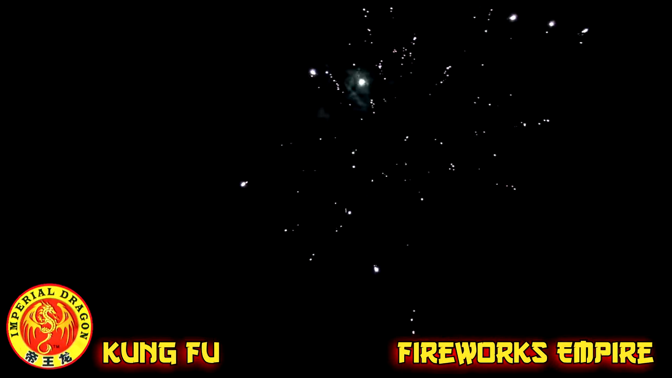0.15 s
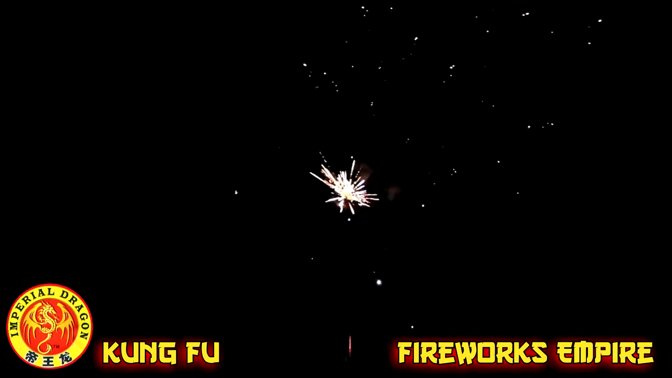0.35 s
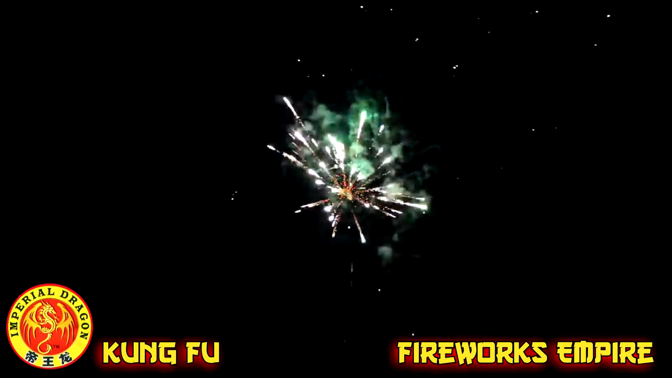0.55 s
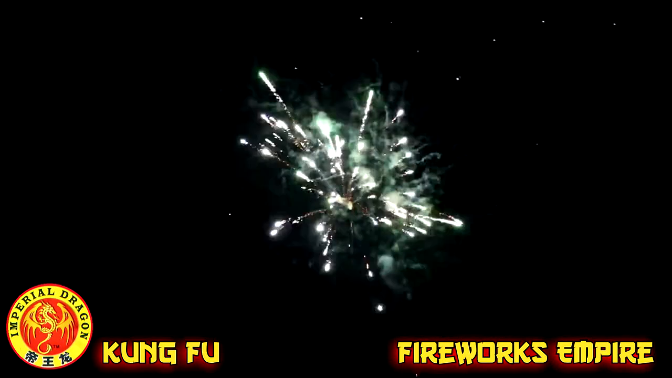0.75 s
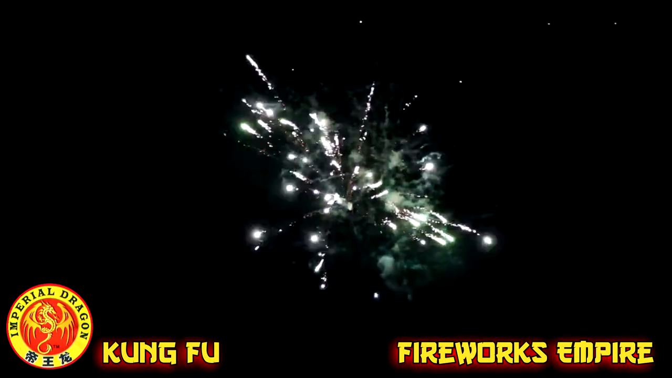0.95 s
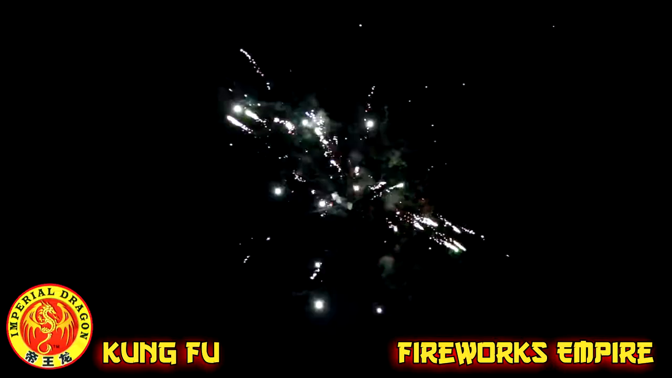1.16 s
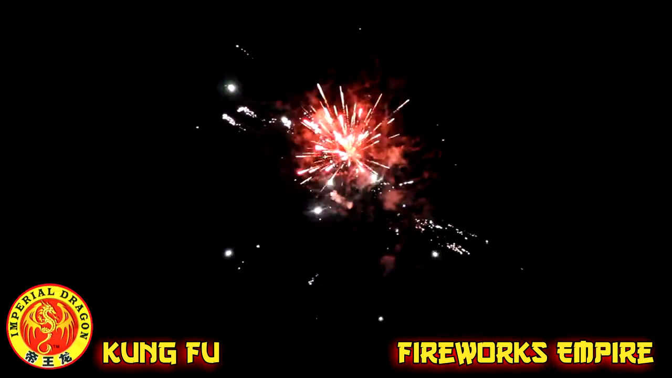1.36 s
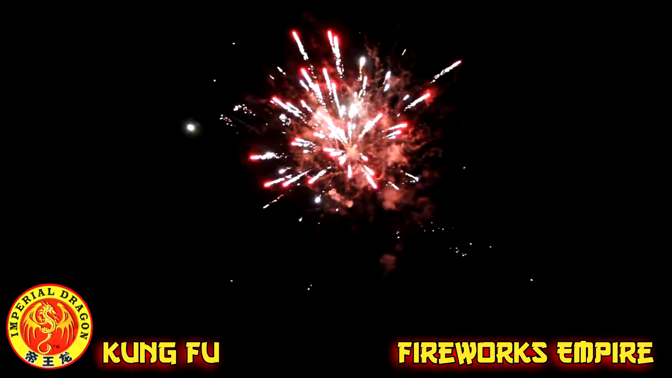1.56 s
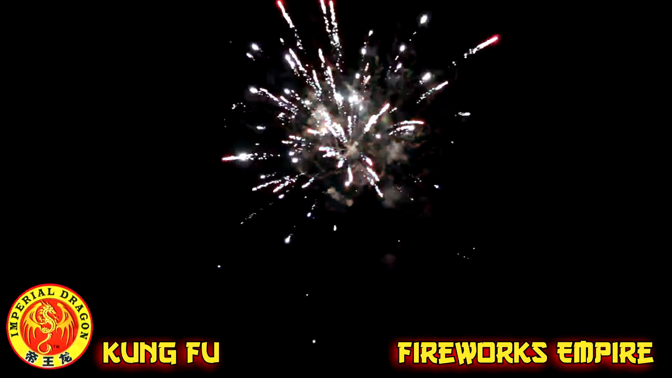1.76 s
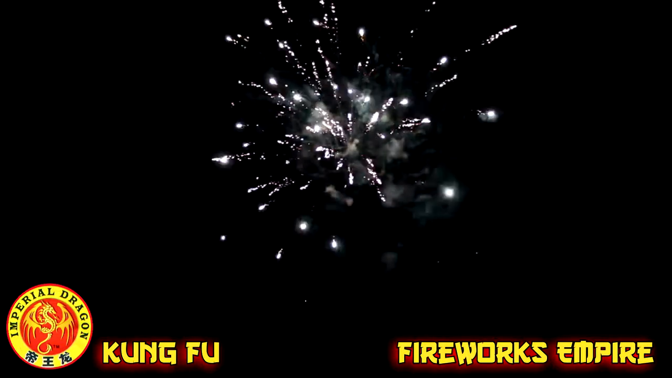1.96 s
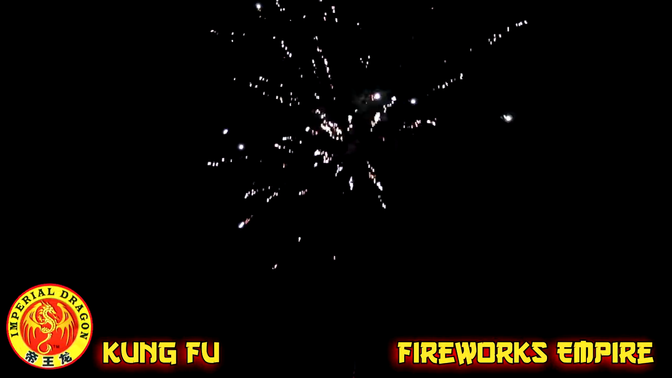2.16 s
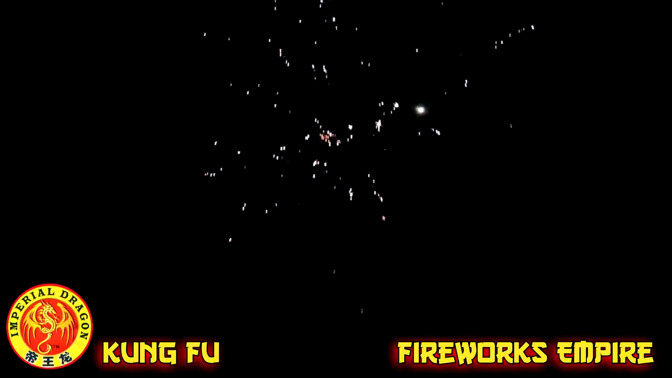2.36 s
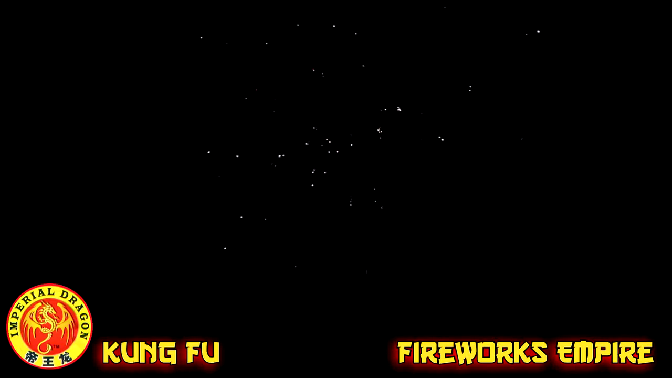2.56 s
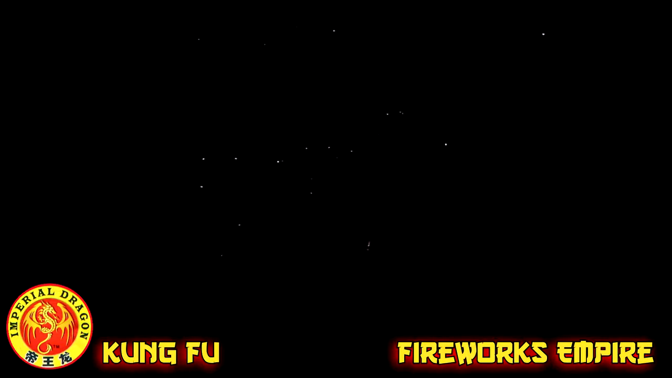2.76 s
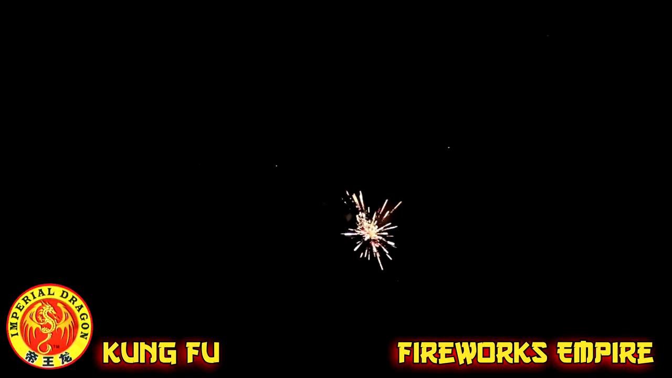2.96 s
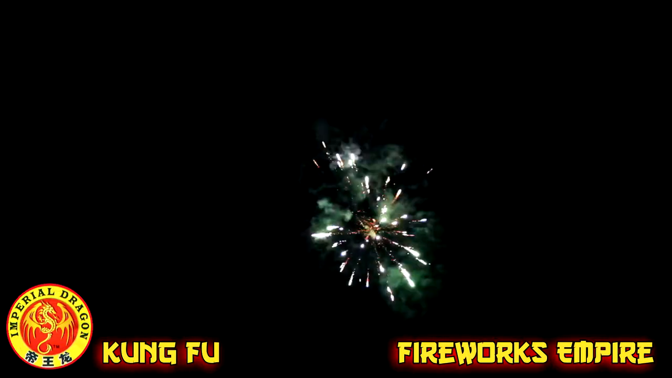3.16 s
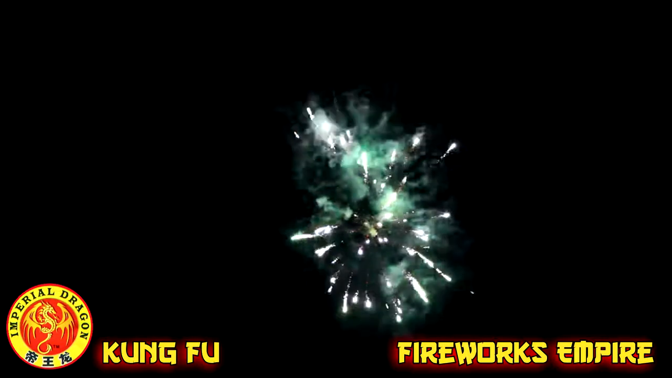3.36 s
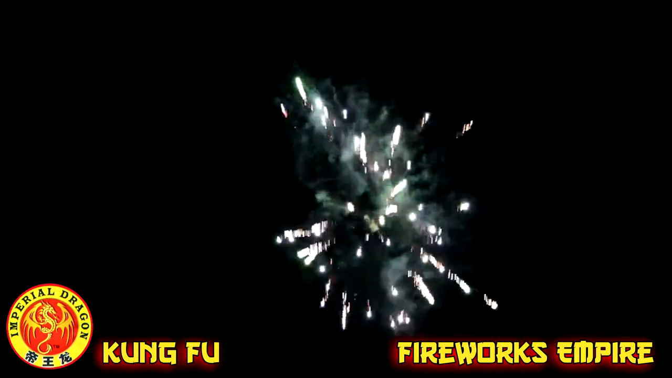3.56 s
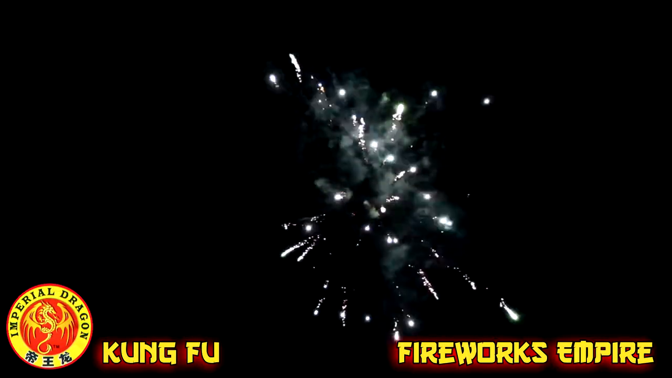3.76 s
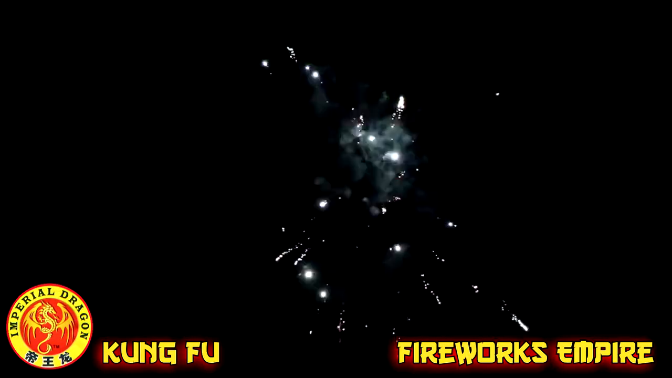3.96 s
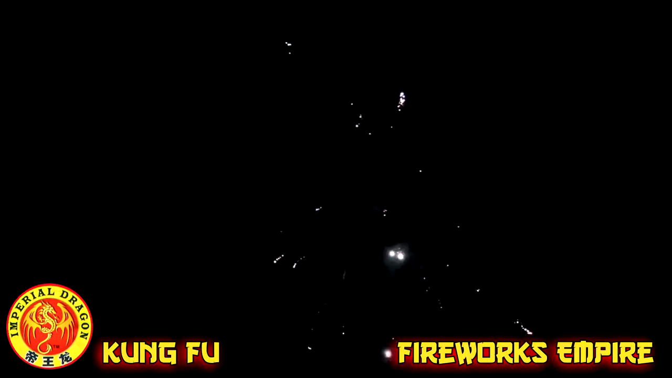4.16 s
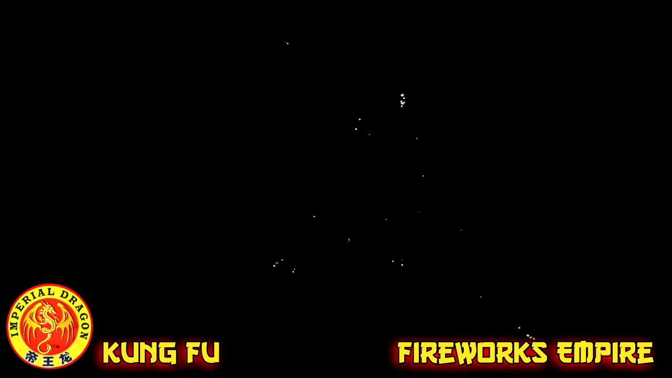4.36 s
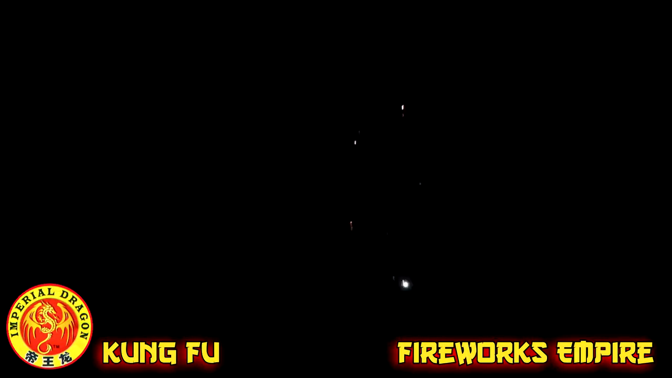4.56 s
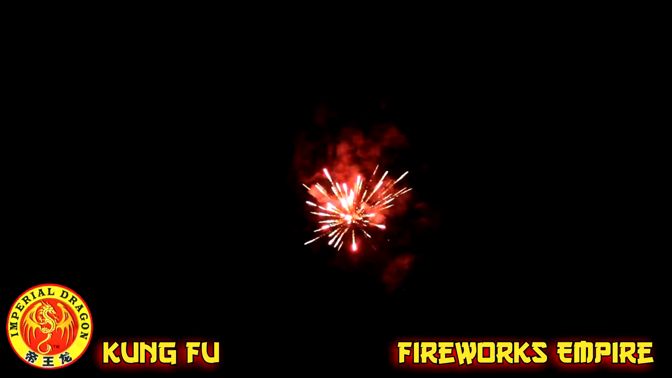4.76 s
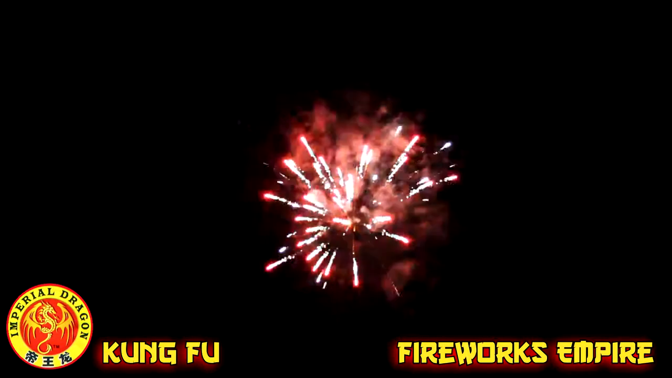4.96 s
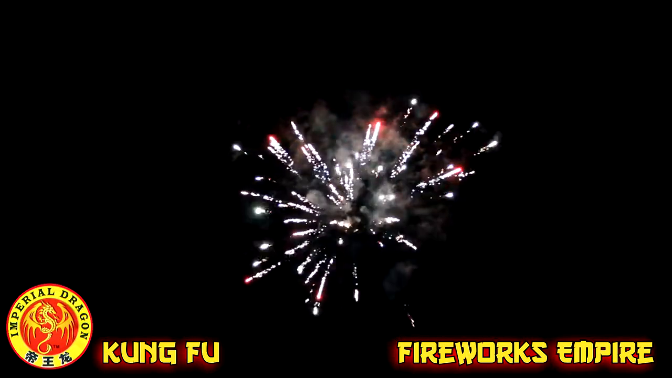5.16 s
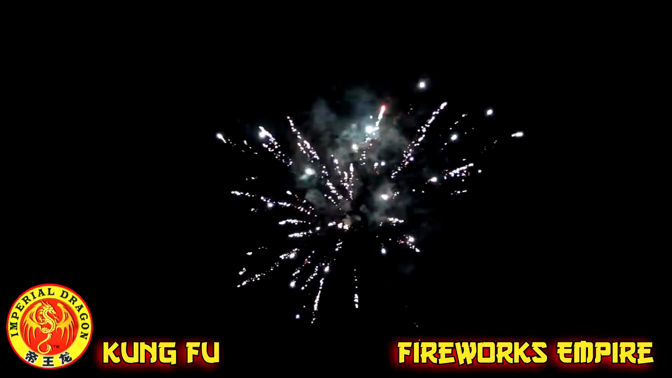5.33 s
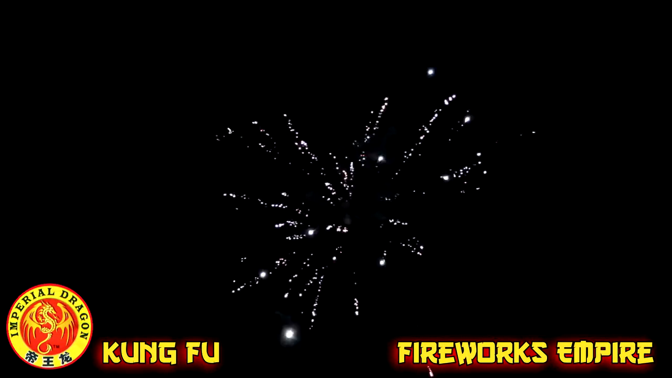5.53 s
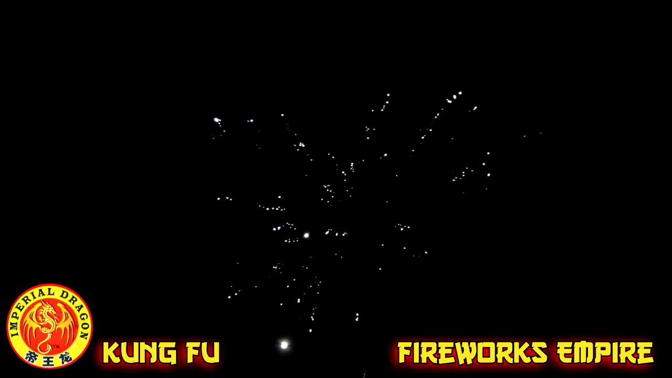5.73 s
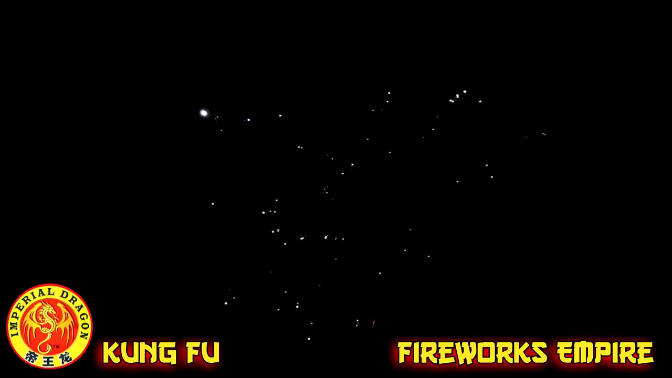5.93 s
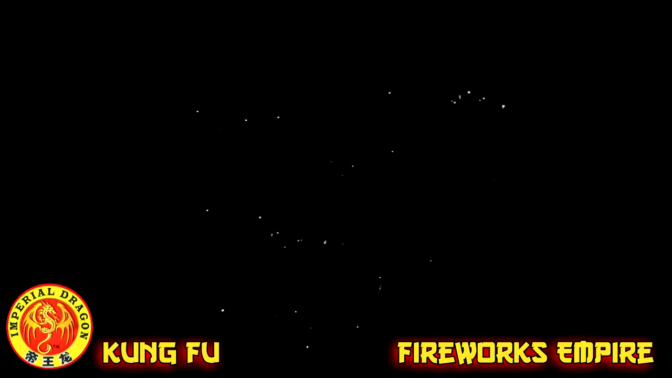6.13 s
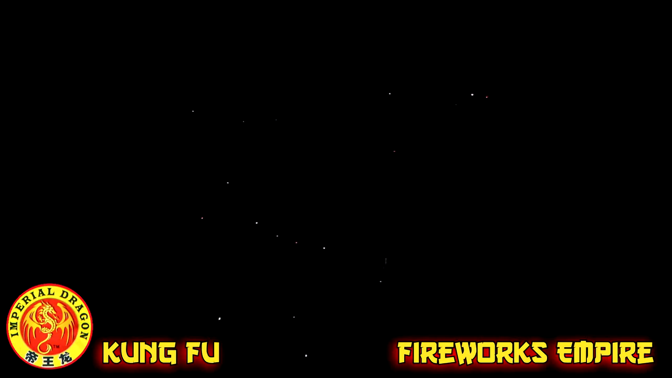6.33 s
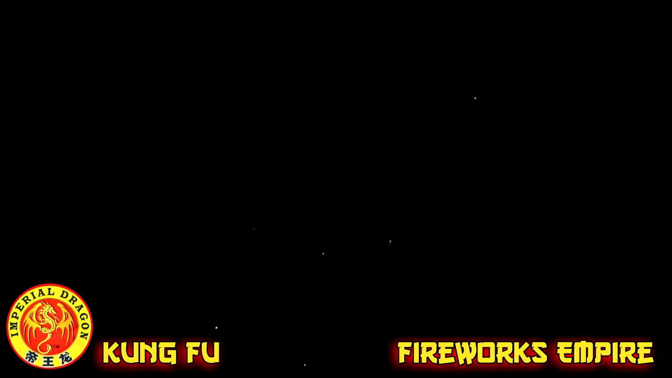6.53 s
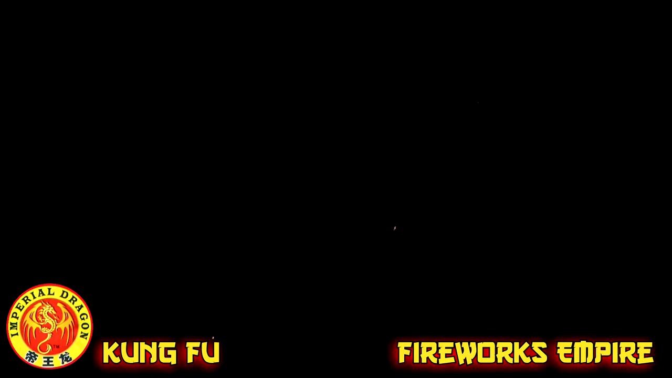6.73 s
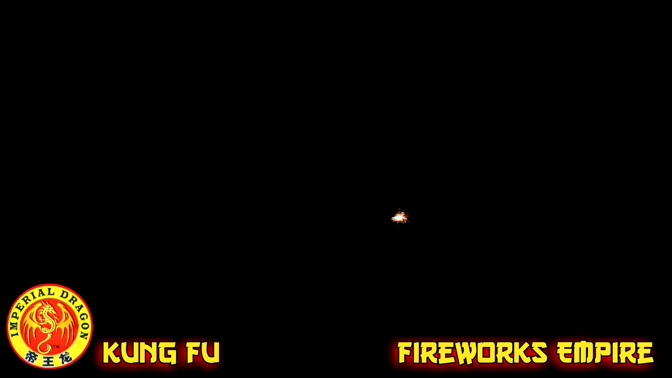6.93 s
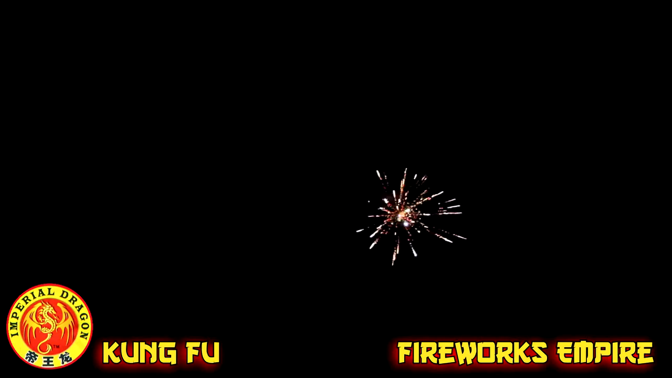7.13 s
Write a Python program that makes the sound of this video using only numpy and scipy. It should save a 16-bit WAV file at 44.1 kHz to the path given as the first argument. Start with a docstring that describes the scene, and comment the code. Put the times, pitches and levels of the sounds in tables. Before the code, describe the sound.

Spaced firework bangs at night: thumping launches, sharp distorted bursts, clattering echoes, faint fizz and small hard clinks over distant traffic rumble.

```python
"""A firework cake fires at night in the open: lift charges thump out of tubes, shells burst overhead.
Each blast is a few dying swings; both kinds overload the microphone input.
Ground, walls and trees return them as slaps (short swings) and rolling rumble (bands of noise).
Some stars fizz in noise, spent casings clink nearby as struck modes; far traffic and insects are noise."""
import sys
import numpy as np
from scipy import signal
from scipy.io import wavfile

SR = 44100
rng = np.random.default_rng(int(sys.argv[2]) if len(sys.argv) > 2 else 0)


def output_pcm(signal):
    """Save a mono or channel-first signal as 16-bit PCM at the path in sys.argv[1].

    Samples are clipped to [-1, 1] before scaling.
    """
    pcm = np.clip(np.atleast_2d(signal).T, -1, 1) * 32767
    wavfile.write(sys.argv[1], SR, np.round(pcm).astype(np.int16))


N = 317079
STEP = 16  # samples between envelope points


def amp(db):
    """Decibels to gain."""
    return 10 ** (np.asarray(db) / 20)


def rms_one(x):
    """Scale to unit rms."""
    return x / np.sqrt(np.mean(x ** 2) + 1e-20)


def bandpass(order, low_hz, high_hz, x):
    """Keep the sound between two pitches."""
    return signal.sosfilt(signal.butter(order, [low_hz, high_hz], "band", fs=SR, output="sos"), x)


def delayed(x, seconds):
    """The same sound, later."""
    return np.pad(x, (round(seconds * SR), 0))[:N]


def at_hz(points, hz):
    """Read a spectrum on a log-frequency axis."""
    pitch_hz, level_db = np.transpose(points)
    return np.interp(np.log(hz), np.log(pitch_hz), level_db)


def clicks(times, heights, rate=SR):
    """Impulses on a grid of the given rate; those outside the scene are left out."""
    out = np.full(int(N * rate / SR) + 1, 1e-18)
    at = np.round(np.asarray(times) * rate).astype(int)
    inside = (at >= 0) & (at < len(out))
    np.add.at(out, at[inside], np.asarray(heights)[inside])
    return out


def ring(x, hz, t60):
    """A shock front: the pressure jumps, then swings as a dying cosine."""
    r, w = amp(-60 / (t60 * SR)), 2 * np.pi * hz / SR
    return signal.lfilter([1, -r * np.cos(w)], [1, -2 * r * np.cos(w), r * r], x)[:N]


def drift(rate):
    """Slow chance on the envelope grid, spread 1."""
    r = np.exp(-2 * np.pi * rate * STEP / SR)
    noise = rng.standard_normal(N // STEP + 4001)
    return rms_one(signal.lfilter([1], [1, -2 * r, r * r], noise)[4000:])


AIR_DB_PER_S, AIR_STEEPNESS = 6.5, 1.7  # loss at 10 kHz along an echo's path, and its power of frequency


def return_power(shots, returns, colour):
    """A function of Hz: power in time of scattered returns, each swelling, dying and losing treble to air."""
    s, shot_db = np.transpose(shots)[:2]
    rate, shapes = SR / STEP, []
    for delay, db, rise, t60, tilt in returns:
        up, down = np.exp(-1 / (max(rise, 1e-4) * rate)), amp(-120 / (t60 * rate))
        begun = np.maximum(-s - delay, 0)  # a return already under way at the start has faded
        power = amp(2 * (shot_db + db - 60 * begun / t60))
        starts = clicks(s + delay + begun, power, rate)
        shapes.append(signal.lfilter([1 - up], np.convolve([1, -up], [1, -down]), starts))
    shapes = np.array(shapes)
    t = np.arange(shapes.shape[1]) / rate
    newest = np.maximum(np.searchsorted(s, t) - 1, 0)
    age = np.maximum(t - s[newest], 0)  # time the newest shot has travelled
    tilts = np.array(returns)[:, 4]

    def power_at(hz):
        level_db = at_hz(colour, hz) + tilts * np.log2(hz / 1000)
        air_db = AIR_DB_PER_S * age * (hz / 10000) ** AIR_STEEPNESS
        return amp(2 * level_db) @ shapes * amp(-2 * air_db)

    return power_at


# Lift charges at the tubes: start_s, level_db
LIFT_SHOTS = [(0.0383, 3.5), (1.7807, 2.5), (3.4436, 2), (5.2667, 3.5), (7.0439, 4)]
# Shells overhead, the first just before the start: start_s, level_db,
# across_m, along_m (both from the middle of the sky)
BURST_SHOTS = [(-0.53, -5, 0.01, 0.01), (0.4715, 5.5, 0.2, 1.5), (1.4204, 5, -2.5, -0.04),
               (3.0471, 5.5, 1.55, -2.5), (4.8286, 6, 0.16, 0.57), (7.1428, 5.5, 0.01, 0.01)]
# Gas jet just ahead of and with a lift's thump, then its scattered returns:
# delay_s, level_db (over the lift), rise_s, t60_s, tilt_db_per_octave
LIFT_SCATTER = [(-.0016, -3.5, 0.00053, 0.059, 1), (0, 3, 0.00014, 0.011, 6.5),
                (0.0117, -11.5, .0005, 0.19, 0.5), (.038, -12.5, 0.0021, 0.073, 0),
                (0.0774, -15.5, 0.00081, 0.075, 2), (.148, -20.5, 0.0022, 0.059, 2),
                (0.204, -23.5, .001, 0.037, -0.5), (.263, -33, .001, 0.068, 1),
                (.02, -23, 0.0092, 0.51, 1.5)]
# Roar of a burst, then its scattered returns:
# delay_s, level_db (over the burst), rise_s, t60_s, tilt_db_per_octave
BURST_SCATTER = [(0, 4, 0.00066, 0.063, -1.5), (.016, -10, 0.0022, 0.23, 0), (.046, -14, .002, 0.02, -7),
                 (0.083, -25, 0.0047, 0.55, 1.5), (0.129, -22, 0.0015, 0.11, -0.5),
                 (.05, -30, 0.024, 1.08, -0.5), (.3, -36, 0.28, 2.05, -1), (.93, -34.5, 0.013, 0.31, -3.5),
                 (1.17, -50, 0.0042, 0.13, -7), (1.443, -38.5, 0.025, 0.11, -2)]
# Spectrum of the lift returns: pitch_hz, level_db (per Hz)
LIFT_SPECTRUM = [(15, -51), (25, -16.5), (312, 0), (479, -9), (519, -9), (610, -15), (1290, -19.5),
                 (2040, -10), (2740, -14), (8030, -23.5), (15300, -52.5)]
# Spectrum of the burst returns and the fizz: pitch_hz, level_db (per Hz)
BURST_SPECTRUM = [(15, -62), (25, -38), (49, -20), (81, -11.5), (245, -7.5), (312, -5.5), (519, -4.5),
                  (938, -0.5), (1190, -1), (1880, -8.5), (2340, -6), (8030, -17.5), (9960, -22),
                  (15300, -73)]
# Stars of glittering shells start to fizz: start_s, level_db
FIZZ_STARTS = [(0, -34.5), (0.88, -30), (3.47, -29)]
# Swell of one fizz: delay_s, level_db (over its start level), rise_s, t60_s, tilt_db_per_octave
FIZZ_SWELL = [(0.0015, -2.5, 0.018, 2.17, -1)]
# Background between the blasts: start_s, traffic_db, insects_db
NIGHT_LEVELS = [(0, -20, -54), (.45, -39, -52.5), (.86, -33, -68), (1.4, -23.5, -56), (2.5, -25, -64),
                (3, -27, -58.5), (4.2, -30, -60), (4.8, -25.5, -57), (6.1, -31.5, -58), (6.6, -26, -56),
                (7.19, -23.5, -56.5)]
# Spectrum of the far traffic: pitch_hz, level_db (per Hz)
TRAFFIC_SPECTRUM = [(15, -54), (30, -27), (80, -5.5), (140, -9), (260, -18), (450, -7), (830, -0.5),
                    (1800, -15), (3500, -24), (6000, -34), (10000, -40), (15000, -60)]
LOW_BOUNCE_S, LOW_BOUNCE_GAIN = 0.0007, 0.068


def rumble_fizz_and_traffic(patchy_db, return_db):
    """Quarter-octave bands of noise carry the roar and scattered returns, the fizz and the traffic."""
    lift = return_power(LIFT_SHOTS, LIFT_SCATTER, LIFT_SPECTRUM)
    burst = return_power(BURST_SHOTS, BURST_SCATTER, BURST_SPECTRUM)
    fizz = return_power(FIZZ_STARTS, FIZZ_SWELL, BURST_SPECTRUM)
    grid = np.arange(N // STEP + 1) * STEP
    traffic_db = np.interp(grid / SR, *np.transpose(NIGHT_LEVELS)[:2])
    edges = 22 * 2 ** (np.arange(39) / 4)
    white = rng.standard_normal((2, N))  # neighbouring bands take turns, so they differ
    flutter, out = drift(48.9), 0
    for k, (low, high) in enumerate(zip(edges, edges[1:])):
        hz = np.sqrt(low * high)
        uneven_db = patchy_db * (flutter + drift(22))  # many reflectors, unevenly spaced
        echoes = (lift(hz) + burst(hz) + fizz(hz)) * amp(2 * (return_db + uneven_db))
        traffic = amp(2 * (at_hz(TRAFFIC_SPECTRUM, hz) + traffic_db))
        gain = np.interp(np.arange(N), grid, np.sqrt(echoes + traffic))
        out = out + gain * bandpass(2, low, high, white[k % 2])
    # far sound also skims off the ground by the microphone, inverted
    return out - LOW_BOUNCE_GAIN * delayed(out, LOW_BOUNCE_S)


INSECT_HZ, INSECT_WIDTH_HZ = 4660, 650


def insects():
    """A far chorus blurs into a band of hiss."""
    low, high = INSECT_HZ - INSECT_WIDTH_HZ / 2, INSECT_HZ + INSECT_WIDTH_HZ / 2
    hiss = bandpass(3, low, high, rng.standard_normal(N))
    level_db = np.interp(np.arange(N) / SR, *np.transpose(NIGHT_LEVELS)[::2])
    return amp(level_db) * rms_one(hiss)


def blasts(shots, modes, spread_db, detune):
    """Every shot swings in each mode with a strength and a pitch of its own."""
    luck, out = rng.standard_normal((len(shots), len(modes), 2)), 0
    for (s, shot_db, *_), row in zip(shots, luck):
        for (hz, db, t60), (louder, higher) in zip(modes, row):
            jump = clicks([s], [amp(shot_db + db + spread_db * louder)])
            out = out + ring(jump, hz * (1 + detune * higher), t60)
    return out


# What a lift rings with at the tube: pitch_hz, level_db (over the lift), t60_s
TUBE_MODES = [(279.5, 14.5, 0.018), (209, 11.5, 0.013), (60, 5, 0.014), (900, 11, 0.0019)]
GROUND_ECHO_S, GROUND_ECHO_DB, GROUND_HZ = 0.005024, -12.5, 410


def lifts():
    """The tube's thump, and a duller copy off the ground."""
    direct = blasts(LIFT_SHOTS, TUBE_MODES, spread_db=0.8, detune=0.015)
    dull = signal.sosfilt(signal.butter(1, GROUND_HZ, fs=SR, output="sos"), direct)
    return direct + amp(GROUND_ECHO_DB) * delayed(dull, GROUND_ECHO_S)


def shock(hz, turns, top_hz):
    """One reflected shock: a jump, a few swings at most, then still air; dulled on the way."""
    cycles = np.arange(600) / SR * hz
    wave = np.cos(2 * np.pi * cycles) * np.exp(-(cycles / turns) ** 4)
    return signal.sosfilt(signal.butter(2, np.clip(top_hz, 500, 15000), fs=SR, output="sos"), wave)


CRACK_LOW_HZ, CRACK_TOP_HZ, CRACK_T60_S = 1200, 4220, 0.023


def crack():
    """A rough front breaks the shock into a few milliseconds of bright grit."""
    grit = rng.standard_normal(600) * amp(-60 * np.arange(600) / SR / CRACK_T60_S)
    return bandpass(3, CRACK_LOW_HZ, CRACK_TOP_HZ, grit)


# Walls and far fronts that slap the bursts back: delay_s, path_per_m_across, path_per_m_along (extra m per m),
# level_db (over the burst), swing_hz, swings, crack_db (over the slap)
WALL_ECHOES = [(0.0471, 0.0072, 0.028, 0, 1026, 0.89, -32), (0.0524, 0.018, 0.072, -8, 800, 1.3, -34),
               (.233, .3, 0, -33, 900, 1.1, 1), (0.2595, .74, .32, -14, 880, 0.99, -25),
               (0.2815, 1.03, 0.2, -25, 900, 0.84, 3), (0.2831, 1.01, 0.15, -14.5, 900, 1.26, -3),
               (.6624, 0.597, 0.44, -25.5, 670, 1.26, -25), (.794, 0.17, 1.9, -31, 800, 1.5, -25),
               (.9035, 0.077, .95, -31.5, 702, 1.4, -16), (.9352, 0, 1.01, -27, 800, 1.26, 0.5),
               (0.9617, .2, 1.1, -26, 1020, 1.55, -3.5), (.977, .7, 1.3, -26, 780, 3.7, -21.5),
               (1.3129, .3, .15, -32, 920, 1.4, -5.5), (1.459, 0.18, 0.67, -29.5, 860, 1.9, -5),
               (1.484, 0, .6, -28, 805, 1.5, -10)]
# Lone louder slaps among the patter, some of them low thuds: start_s, level_db, swing_hz
LONE_SLAPS = [(0.9769, -21.5, 900), (1.9509, -19, 900), (2.5942, -25, 710), (2.8704, -22.5, 800),
              (3.811, -23.5, 693), (4.309, -29, 377), (4.487, -31, 320), (5.441, -20.5, 815)]
LONE_SWINGS, SLAP_SPREAD_DB, SOUND_M_PER_S = 1.97, 0.9, 343


def slaps():
    """Walls return each burst, earlier or later as the shell stood; fainter slaps are duller; some stand alone."""
    luck = rng.standard_normal((len(BURST_SHOTS), len(WALL_ECHOES)))
    arrivals = []
    for (s, burst_db, across, along), row in zip(BURST_SHOTS, luck):
        for (delay, a, b, db, hz, turns, crack_db), louder in zip(WALL_ECHOES, row):
            arrival = s + delay + (a * across + b * along) / SOUND_M_PER_S
            level_db = burst_db + db + SLAP_SPREAD_DB * louder
            arrivals.append((arrival, level_db, hz, turns, crack_db))
    for s, level_db, hz in LONE_SLAPS:
        arrivals.append((s, level_db, hz, LONE_SWINGS, -np.inf))  # no crack
    out = np.zeros(N + SR)
    for s, level_db, hz, turns, crack_db in arrivals:
        at = round(s * SR)
        if 0 <= at < N:
            front = shock(hz, turns, top_hz=14000 * amp(0.67 * level_db))
            out[at:at + 600] += amp(level_db) * (front + amp(crack_db) * crack())
    return out[:N]


# What a shell rings with overhead: pitch_hz, level_db (over the burst), t60_s
SHELL_MODES = [(800, 5.2, 0.0039), (649.7, 17.1, 0.016), (854, 15, 0.022), (1124, 5.4, 0.025),
               (443, 7.7, 0.022), (284.5, 4.8, 0.024), (152, 1.7, 0.034)]


def bursts():
    """Each shell's shock rings in modes whose strength and pitch vary from shell to shell."""
    return blasts(BURST_SHOTS, SHELL_MODES, spread_db=3.0, detune=0.04)


def patter(per_s, level_db, t60):
    """Countless small far echoes of the bursts, thinning in level as the paths grow."""
    s, burst_db = np.transpose(BURST_SHOTS)[:2]
    fading = signal.lfilter([1], [1, -amp(-60 / (t60 * SR))], clicks(s, amp(burst_db)))[:N]
    strength = amp(4.1 * np.minimum(rng.exponential(1, N), 2))
    hits = (rng.random(N) < per_s / SR) * strength * fading
    dealt = rng.integers(0, 4, N)  # which of four swing pitches each echo takes
    out = 0
    for k, hz in enumerate([646, 755, 880, 1050]):
        out = out + signal.fftconvolve(hits * (dealt == k), shock(hz, turns=1.8, top_hz=1600))[:N]
    return amp(level_db) * out


# Casings and grit landing nearby on something hard: start_s, level_db (peak before scatter),
# rattle_s, pitch_factor
CLINK_HITS = [(0.7366, -9.5, 0.0044, 1.08), (2.153, -10, 0.0045, 0.97), (2.768, -32, 0.0048, 0.62),
              (2.9378, -32.5, 0.0028, 0.95), (3.5914, -1.5, 0.005, 0.943), (4.053, -27, 0.0062, 1.03),
              (4.304, -26.5, 0.013, 1.03), (4.4383, -35, 0.0088, .65), (6.4247, -32.5, 0.003, 0.97)]
# What a casing rings with: pitch_hz (before the pitch factor), level_db, t60_s
CASING_MODES = [(1595, -5, 0.0062), (1940, -8.5, 0.0063), (2870, -30, 0.12), (2974, 1.5, 0.0083),
                (3390, -8, 0.017), (5270, -41, 0.00227)]


def clinks():
    """A piece rattles for a few milliseconds: a swell of uneven taps into its modes, pitched by its size."""
    out, t = np.zeros(N), np.arange(8000) / SR
    grits = rng.standard_normal((len(CLINK_HITS), len(t)))
    for (s, peak_db, rattle, pitch), grit in zip(CLINK_HITS, grits):
        taps = grit * np.sin(np.pi * np.clip(t / rattle, 0, 1))
        ringing = sum(amp(db) * ring(taps, hz * pitch, t60) for hz, db, t60 in CASING_MODES)
        hit = bandpass(2, 1000, 5000, ringing)
        at = round(s * SR)
        out[at:at + len(t)] += amp(peak_db) * hit / np.abs(hit).max()
    return out


SMEAR_DB, SMEAR_T60_S = -9.5, 0.036


def smeared(x):
    """Hedges and uneven ground add a short dying scatter."""
    t = np.arange(SR // 5) / SR
    scatter = rng.standard_normal(len(t)) * amp(-60 * t / SMEAR_T60_S) * (t > 0.002)
    return x + amp(SMEAR_DB) * signal.fftconvolve(x, scatter / np.linalg.norm(scatter))[:N]


def scene():
    """All sources at one microphone."""
    bangs = lifts() + bursts()
    far = rumble_fizz_and_traffic(patchy_db=1.29, return_db=10.5)
    far = far + patter(per_s=110, level_db=-43.5, t60=6.8)
    scattered = smeared(slaps() + clinks())
    return (bangs + far + scattered + insects())[None]


MIC_STOP_HZ, CUTOFF_HZ = 15800, 16400  # where each filter reaches its full cut


def record(dry):
    """The microphone dulls the top, the input overloads flat, the top is cut."""
    mic = signal.sosfilt(signal.cheby2(8, 30, MIC_STOP_HZ, fs=SR, output="sos"), dry)
    overloaded = np.clip(mic, -0.99, 0.99)
    return signal.sosfilt(signal.cheby2(14, 85, CUTOFF_HZ, fs=SR, output="sos"), overloaded)


dry = scene()
out = record(dry)
output_pcm(out)
```